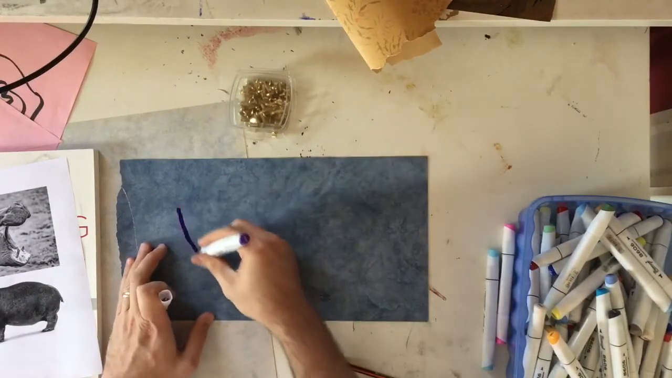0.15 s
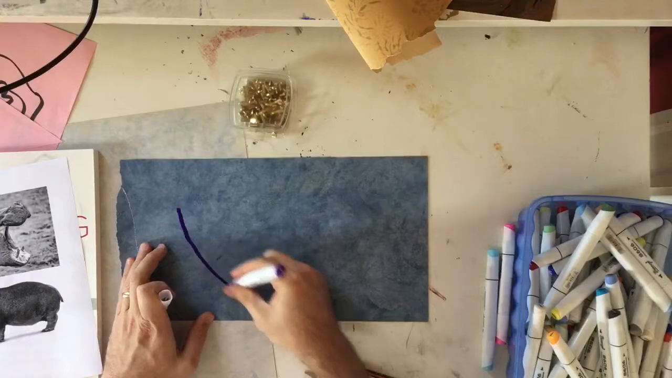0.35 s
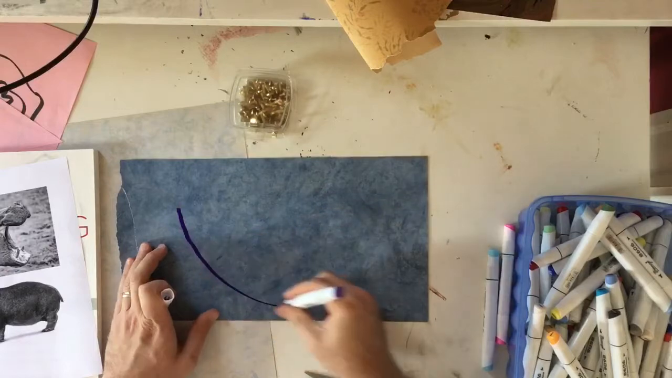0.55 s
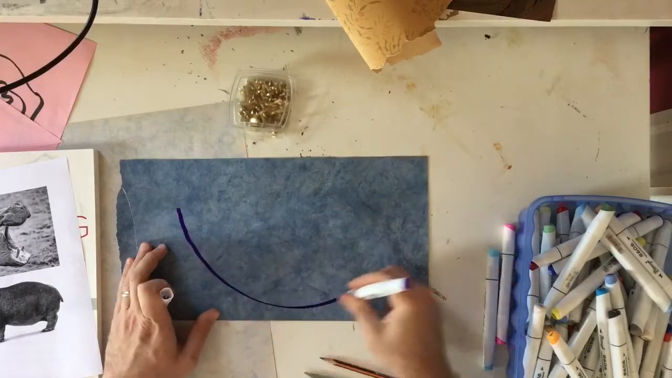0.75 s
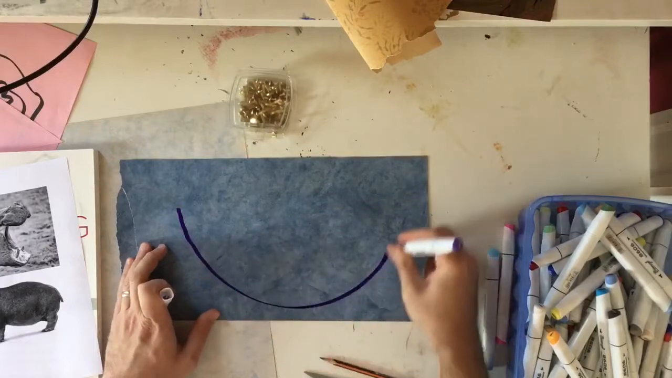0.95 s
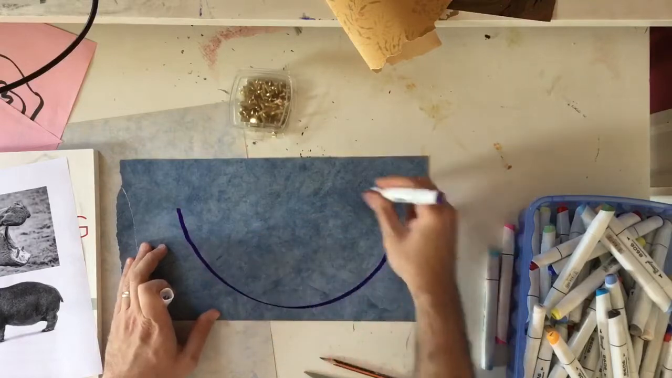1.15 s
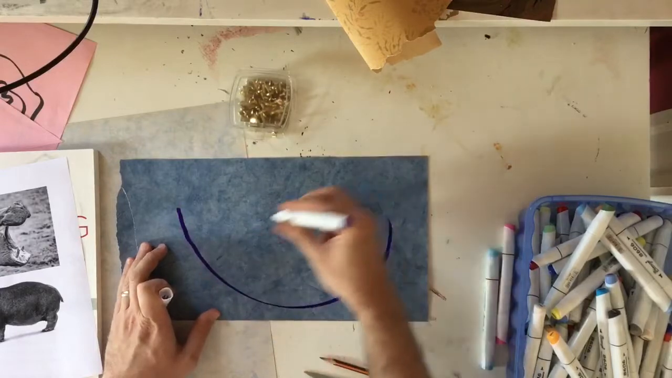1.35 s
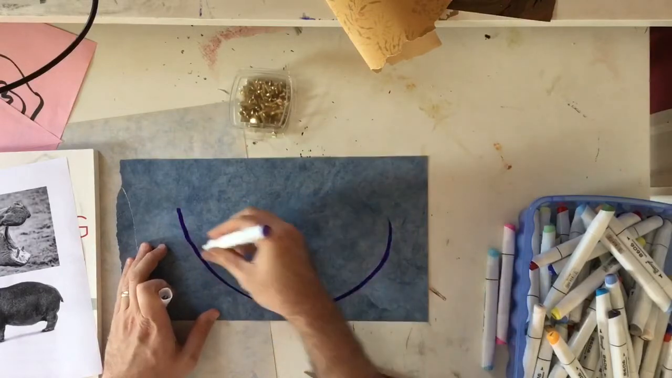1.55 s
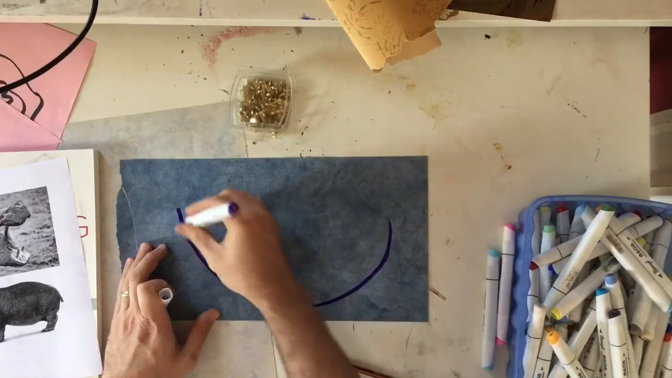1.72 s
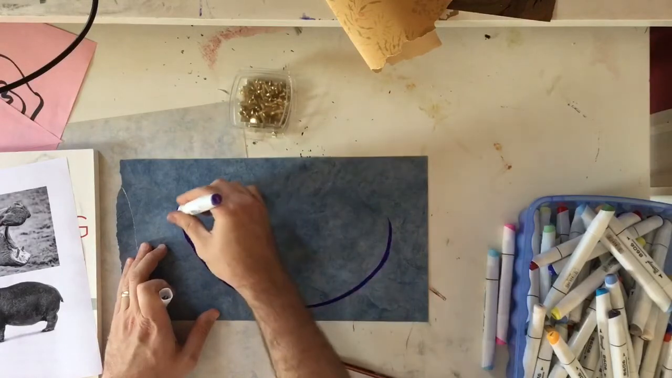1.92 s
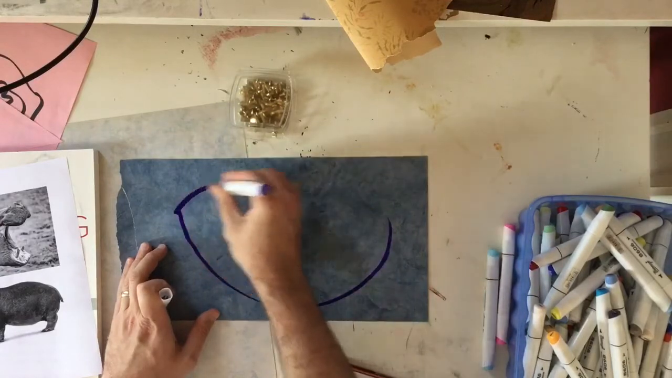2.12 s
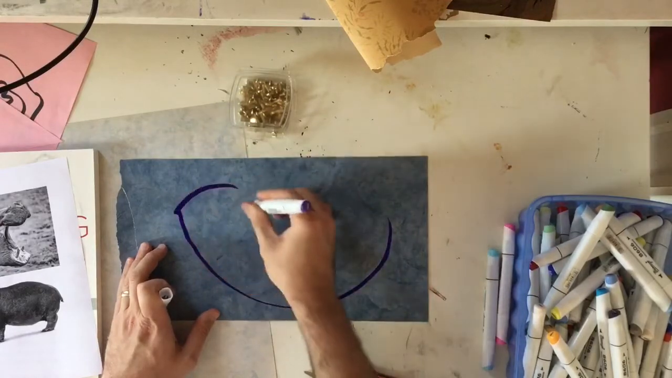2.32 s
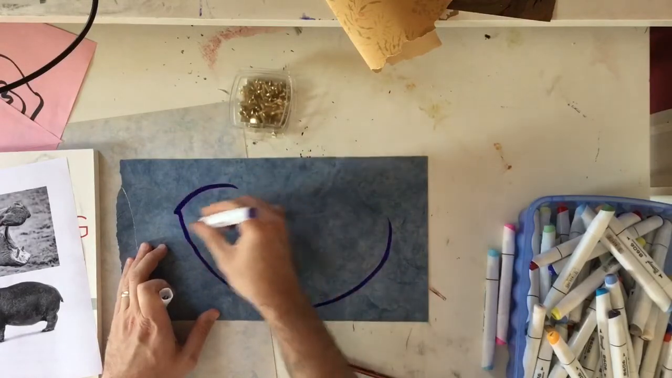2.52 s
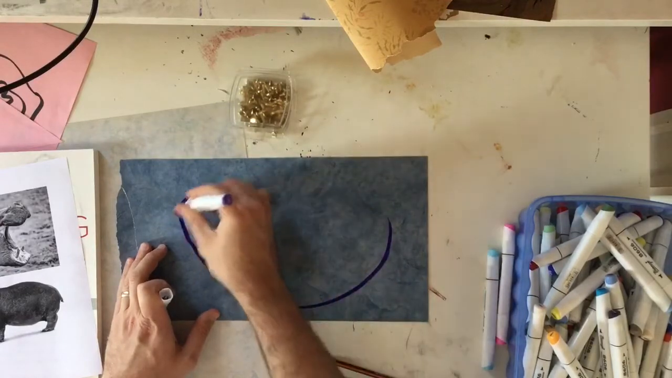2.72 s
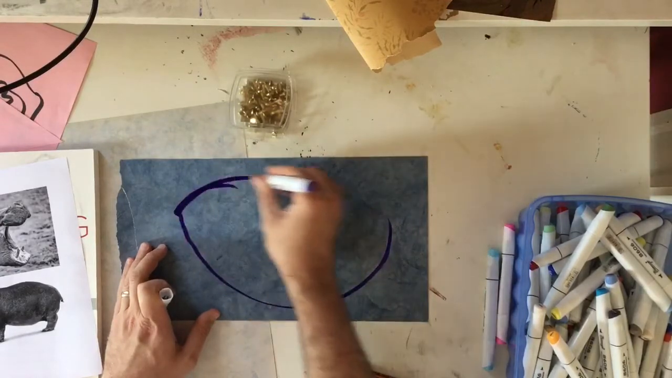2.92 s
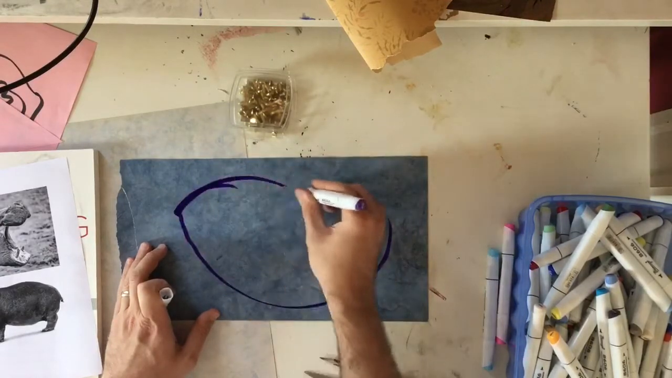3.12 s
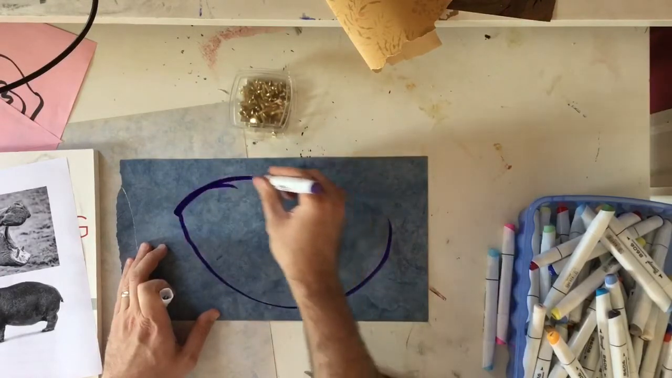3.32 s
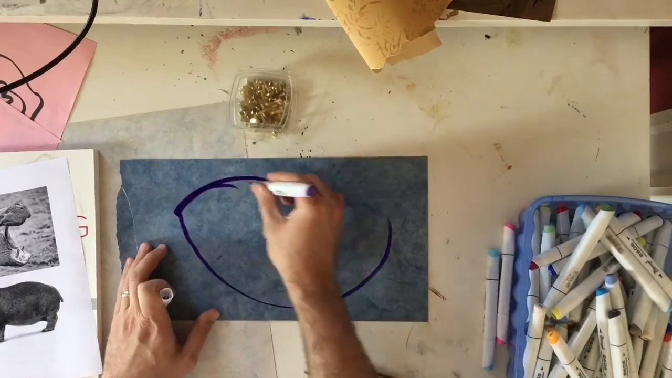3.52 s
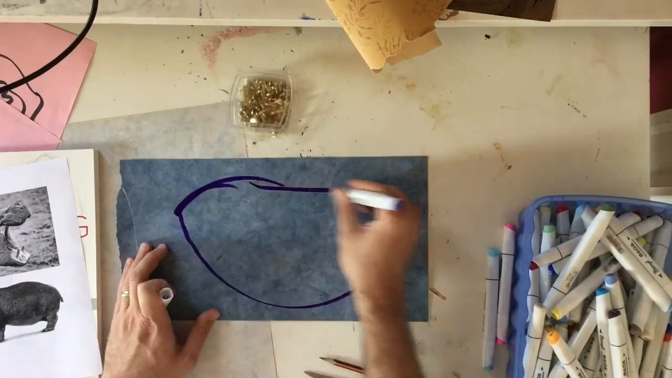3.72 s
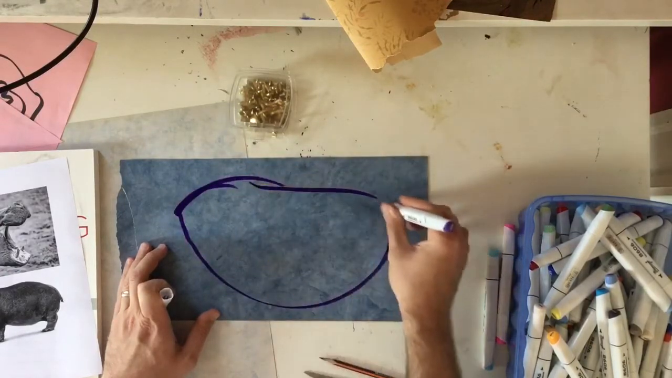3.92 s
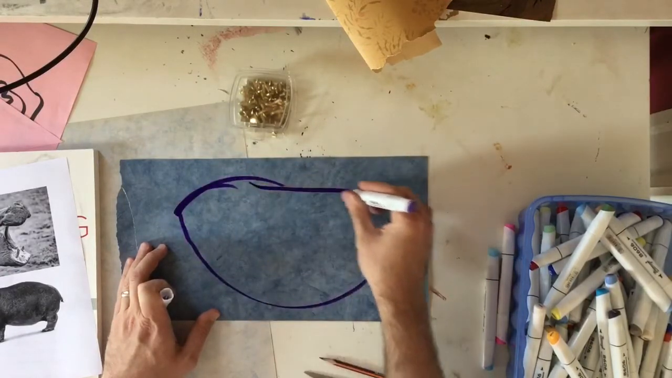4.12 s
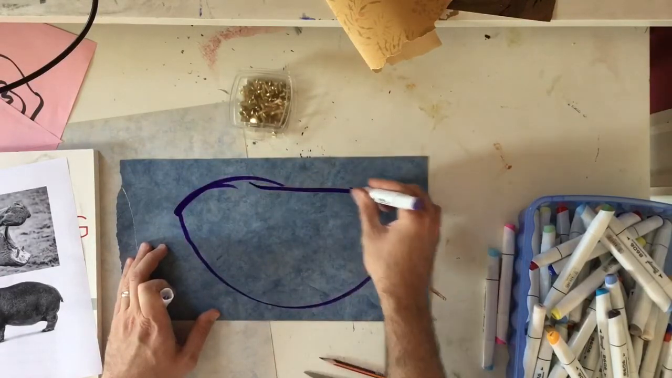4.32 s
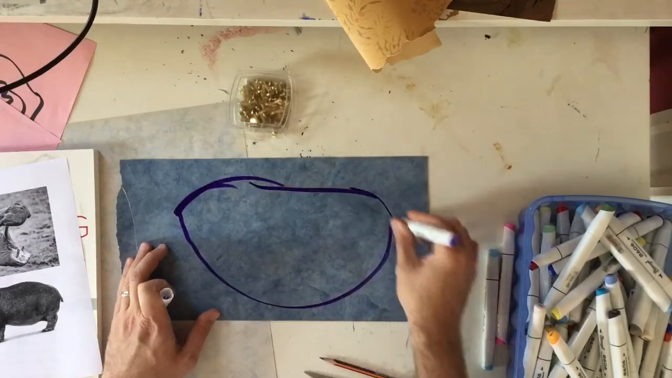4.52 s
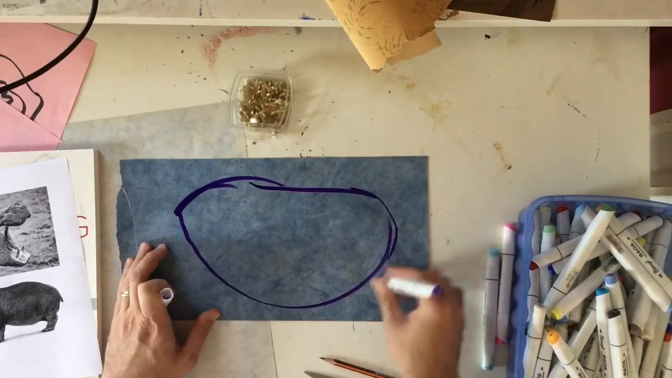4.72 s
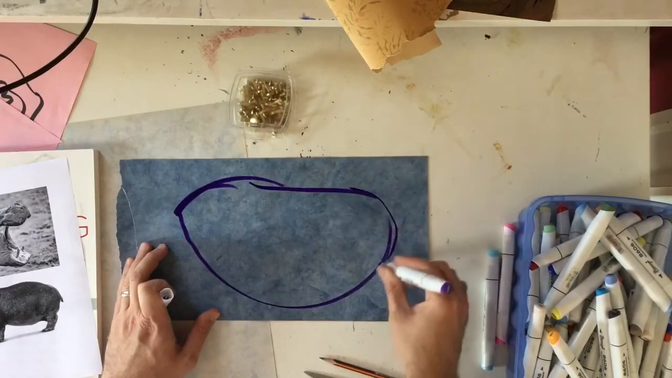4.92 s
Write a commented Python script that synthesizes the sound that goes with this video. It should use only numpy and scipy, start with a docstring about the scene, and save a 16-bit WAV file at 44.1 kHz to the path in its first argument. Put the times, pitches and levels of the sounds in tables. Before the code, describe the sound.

Close, hissy strokes of a felt-tip marker on heavy paper, one long and four shorter, with light table knocks in a small room.

```python
"""A felt-tip marker scratches over heavy paper, close to one microphone, on a table in a small room.
Five curved strokes, the first already under way: the nib lands with a soft thump, gathers speed and
lifts, its friction turning thinner and brighter towards the right of the sheet. Now and then the hand
knocks the table into ringing and the barrel ticks; between strokes the hand skims the paper.
Behind it all the room rumbles faintly."""
import sys
import numpy as np
from scipy import signal
from scipy.fft import rfft, irfft, next_fast_len
from scipy.io import wavfile
from scipy.ndimage import map_coordinates

SR = 44100
rng = np.random.default_rng(int(sys.argv[2]) if len(sys.argv) > 2 else 0)


def master_out(mix):
    """Clip the mix to full scale and print it as 16-bit PCM to the path in sys.argv[1]."""
    frames = np.transpose(np.atleast_2d(mix))
    ceiling = np.clip(frames, -1, 1)
    pcm = np.round(ceiling * 32767).astype(np.int16)
    wavfile.write(sys.argv[1], SR, pcm)


N = 222998


# The marker's path, close to the microphone. Each row: start, lift and attack in seconds, attack
# exponent, release in seconds, base levels of hiss, rub, judder and landing in dB, first and last
# place on the sheet (0 left, 1 right), the sheet's upper resonance at the start in Hz.
STROKES = [(-0.05, 0.98, 0.059, 0.61, 0.078, -59.5, -55.5, -64, -45, 0.015, 0.64, 1320),
           (1.891, 2.064, 0.15, 0.75, 0.26, -58, -55, -63.5, -43, 0.02, 0.47, 1730),
           (2.648, 2.922, 0.12, 0.42, 0.16, -59.5, -58, -58, -46, 0.11, 0.85, 1350),
           (3.458, 3.755, 0.19, 0.39, 0.084, -60, -58.5, -61, -45.5, 0.47, 1, 1350),
           (4.283, 4.617, 0.14, 0.38, 0.05, -62.5, -59, -68, -50.5, 1, 0.87, 1680)]
# The hand eases off. Each row: centre and half width in seconds, change of effort in dB.
EASINGS = [(0.11, 0.098, -4), (0.69, 0.23, -2), (2.91, 0.051, -1.5), (4.47, 0.09, -2)]
def strokes(release_db=22, rub_growth=1.14, rub_across_db=-9, glide_hz_per_s=570):
    """The nib's controls at every sample: each stroke speeds up, holds and dies away along its path."""
    rows, t = np.array(STROKES), np.arange(N) / SR
    current = rows[np.maximum(np.searchsorted(rows[:, 0], t) - 1, 0)]
    start, lift, attack, curve, release, hiss_db, rub_db, judder_db, _, first, last, peak_hz = current.T
    age = t - start
    speed = np.clip(age / attack, 1e-6, 1) ** curve
    effort_db = 20 * np.log10(speed) - release_db * np.maximum(t - lift, 0) / release
    effort_db += sum(db * swell(s, width) for s, width, db in EASINGS)
    place = first + (last - first) * np.clip(age / (lift - start), 0, 1)
    return dict(place=place, hiss_db=hiss_db + effort_db, judder_db=judder_db + effort_db,
                rub_db=rub_db + rub_growth * effort_db + rub_across_db * place,
                peak_hz=peak_hz + glide_hz_per_s * age)


# The paper from close by: the sheet's rub, the fibres' hiss and the fizz in the top octave.
# Each row: frequency in Hz, relative spectral density in dB.
RUB_SPECTRUM = [(100, -2), (480, -4), (750, -0.5), (1150, 1), (1500, 1), (1800, -2), (2050, -7.5),
                (2350, -6), (2900, -26), (5000, -28.5)]
HISS_SPECTRUM = [(25, -50), (300, -22), (1200, -15.5), (2500, -1), (3600, -0.9), (4600, -1.6), (5500, -0.3),
                 (6400, 1), (7400, -9), (9000, -20.5), (14000, -37)]
FIZZ_SPECTRUM = [(5000, -69), (7300, -0.5), (8200, 1), (9300, 5.5), (10200, 2), (11300, 4.5), (12800, -3.5),
                 (15700, -10)]
# Thin whistles as the felt turns. Each row: centre and half width in seconds, pitch in Hz, level in dB.
WHISTLES = [(4.355, 0.055, 12000, -73), (4.595, 0.035, 12800, -71)]
def nib(stroke, high_peak_db=-7.5, low_peak_hz=790):
    """Felt drags over the fibres: they hiss, and the sheet on the table resonates lower down."""
    drag = travelling(friction(snags_per_s=900, snag_db=-9), depth_db=3.3, bins=5, frames=20)
    pressure = amp(0.7 * wobble(45) + 0.6 * wobble(12))
    # towards the right the low resonance fades and the fizz grows
    low_peak_db = 1 - 23 * stroke["place"]
    fizz_db = -12 + 8 * stroke["place"]
    high_peak = amp(high_peak_db) * resonance(stroke["peak_hz"], width_hz=170)
    low_peak = amp(low_peak_db) * resonance(low_peak_hz, width_hz=430)
    rub = amp(stroke["rub_db"]) * (coloured(drag, RUB_SPECTRUM) + high_peak + low_peak)
    hiss = amp(stroke["hiss_db"]) * coloured(drag, HISS_SPECTRUM)
    fizz = amp(stroke["hiss_db"] + fizz_db) * coloured(drag, FIZZ_SPECTRUM)
    whistle = sum(amp(db) * swell(s, width) * resonance(hz, width_hz=600)
                  for s, width, hz, db in WHISTLES)
    return pressure * (rub + hiss + fizz + whistle)


def friction(snags_per_s, snag_db):
    """Countless tiny fibre slips, with a few stronger snags among them."""
    snags = (rng.random(N) < snags_per_s / SR) * rng.standard_normal(N)
    return unit(rng.standard_normal(N) + amp(snag_db) * unit(snags))


def travelling(x, depth_db, bins, frames):
    """As the contact travels over the sheet, narrow resonances come and go."""
    spectra = signal.stft(x, nperseg=1024)[2]
    patch = np.outer(np.hanning(bins), np.hanning(frames))
    ripple = signal.fftconvolve(rng.standard_normal(spectra.shape), patch, "same")
    return signal.istft(spectra * amp(depth_db * unit(ripple)), nperseg=1024)[1][:N]


def resonance(hz, width_hz):
    """A narrow band of noise around a steady or moving centre, at rms 1."""
    carrier = np.exp(2j * np.pi * np.cumsum(np.broadcast_to(hz, N)) / SR)
    baseband = lowpass(rng.standard_normal(N) * carrier.conj(), width_hz / 2, order=2)
    return unit(np.real(baseband * carrier))


# The tabletop right under the nib. Each row: frequency in Hz, relative spectral density in dB.
JUDDER_SPECTRUM = [(25, -60), (50, -25), (110, 4), (200, -6), (300, -3), (390, -4), (480, -17), (800, -40)]
def judder(stroke):
    """Friction shakes the tabletop, which answers with a low dull rub."""
    drag = travelling(friction(snags_per_s=140, snag_db=-3), depth_db=3.5, bins=4, frames=12)
    return amp(stroke["judder_db"]) * coloured(drag, JUDDER_SPECTRUM)


# The hand on the table, near the microphone. Each row: time in seconds, level in dB, contact hardness
# as a cutoff in Hz, boost of the low modes in dB, relative thud level in dB, damping in dB per second.
KNOCKS = [(0.426, -50, 219, -2, 0, 30), (0.485, -49, 278, -1, -4, 37), (0.7762, -37.5, 3450, -10, -1.5, 77),
          (0.78, -28, 770, 5, -16, 37), (2.884, -40, 407, -2.5, 5.5, 73)]
# The nib's soft, quickly damped landing, given as settings of blow().
LANDING = dict(hard_hz=450, boom_db=6, push_db=-0.5, thud_db=0, damping=62, sway_hz=69, sway_t60=0.2, boom_hz=165)
def table():
    """The table takes the hand's knocks and the nib's landings."""
    out = np.zeros(N)
    for s, db, hard_hz, boom_db, thud_db, damping in KNOCKS:
        add(out, s, amp(db) * blow(hard_hz, boom_db, thud_db, damping))
    for start, *_, landing_db, _first, _last, _peak_hz in STROKES:
        if start > 0:
            add(out, start, amp(landing_db) * blow(**LANDING))
    # the top radiates hardly any deep bass
    return signal.sosfilt(signal.butter(5, 47, "high", fs=SR, output="sos"), out)


# The table's modes. Each row: frequency in Hz, relative level in dB, free t60 in seconds.
TABLE_MODES = [(99, -14, 0.25), (119.6, 0, 0.31), (168.8, -7, 0.35), (216.8, -13, 0.5), (253.6, -13, 0.2),
               (282.6, -14, 0.21), (306, -9, 0.31), (346, -18, 0.22), (378, -19, 0.21), (406, -19.5, 0.2),
               (487, -14, 0.17), (531, -7, 0.16), (628, -5, 0.17), (696, -17, 0.26), (757, -14, 0.2),
               (863, -14, 0.2), (1000, -10, 0.22), (1276, -8, 0.18), (1372, -6.5, .16), (1423, -6, 0.16),
               (1504, -5.5, .17), (1648, -9.5, 0.14), (2155, -11.5, 0.18), (2246, -8.5, 0.16)]
# The dull body of a blow. Each row: frequency in Hz, relative spectral density in dB.
THUD_SPECTRUM = [(40, -35), (100, -29), (200, -20), (400, 8), (480, -20), (650, 8), (1600, -3.5),
                 (3500, -12), (8000, -21)]
def blow(hard_hz, boom_db, thud_db, damping, push_db=-10.5, sway_hz=69, sway_t60=0.2, boom_hz=230):
    """The table rings and its top sways; soft contacts reach only low modes, a resting hand damps them."""
    t = np.arange(SR * 3 // 4) / SR
    ring, thud_t60 = np.zeros(len(t)), 0.14
    for k, (hz, db, t60) in enumerate(TABLE_MODES):
        # a heavy blow favours the low modes
        mode_db = db + boom_db / (1 + (hz / boom_hz) ** 4) + rng.normal(0, 1)
        ring += (-1) ** k * amp(mode_db - 60 * t / t60) * np.sin(2 * np.pi * hz * t)
    sway = amp(push_db - 60 * t / sway_t60) * np.sin(2 * np.pi * sway_hz * t)
    thud = amp(thud_db - 60 * t / thud_t60) * coloured(rng.standard_normal(N), THUD_SPECTRUM)[:len(t)]
    return lowpass((ring + thud) * amp(-damping * t) + sway, hard_hz, order=8)


# The marker's barrel, close up. Each row: time in seconds, starting level in dB.
BARREL_TICKS = [(0.7765, -38.5), (0.7885, -52), (1.2561, -64.5)]
def barrel(t60=0.036, bright_hz=4600):
    """Hard plastic touches something: a short dry crack."""
    out, t = np.zeros(N), np.arange(SR // 8) / SR
    for s, db in BARREL_TICKS:
        crack = unit(lowpass(rng.standard_normal(len(t)), bright_hz, order=3))
        add(out, s, amp(db - 60 * t / t60) * crack)
    return out


# The side of the hand on the sheet, faint even this near.
# Each row: start and length in seconds, level in dB, fade in dB per second.
SKIMS = [(1.608, 0.27, -67, 80), (2.355, 0.1, -61.5, 5), (2.458, 0.21, -64, 57)]
# Skin on paper. Each row: frequency in Hz, relative spectral density in dB.
SKIN_SPECTRUM = [(1000, -24), (2500, -15.5), (4700, -11), (5400, 0), (6200, 0.5), (6800, -7), (8200, -12),
                 (9200, -9.5), (11500, -13), (13000, -16), (15700, -27)]
def hand(edge_s=0.029):
    """Dry skin whispers over the paper with a narrow peak in the treble; each skim fades as it goes."""
    t, level = np.arange(N) / SR, np.zeros(N)
    for start, length, db, fade in SKIMS:
        touch = np.clip(np.minimum(t - start, start + length - t) / edge_s, 0, 1)
        level += touch * amp(db - fade * np.clip(t - start, 0, length))
    return level * coloured(friction(snags_per_s=190, snag_db=-9.5), SKIN_SPECTRUM)


# The small room around the table. Each row: frequency in Hz, t60 in seconds.
ROOM_DECAY = [(100, 0.31), (600, 0.38), (2500, 0.17), (12000, 0.032)]
def room_echo(x):
    """The room answers after a short delay, each frequency dying at its own speed."""
    hz, t, spectra = signal.stft(rng.standard_normal(SR // 2), SR, nperseg=256)
    decay = amp(-60 * t / along(ROOM_DECAY, hz)[:, None])
    tail = signal.istft(spectra * decay, SR, nperseg=256)[1]
    tail = np.pad(tail, (SR // 200, 0))  # 5 ms
    return signal.fftconvolve(x, tail / np.linalg.norm(tail))[:N]


# Room tone at the microphone. Each row: frequency in Hz, relative spectral density in dB.
AIR_SPECTRUM = [(15, -55), (28, -30), (45, -8), (75, 0), (150, -6), (200, -7.5), (280, -10), (480, -19),
                (800, -22), (1960, -29.5), (3840, -34), (8000, -39.8), (11200, -40.1), (15600, -52.5)]
def room_tone(air_db=-62, rumble_hz=300, rumble_db=-2.2, swell_db=1.7, flutter_db=1.4):
    """Steady room noise whose low rumble swells and flutters a little."""
    air = amp(air_db) * coloured(rng.standard_normal(N), AIR_SPECTRUM)
    rumble = filtered(air, lambda hz: 1 / (1 + (hz / rumble_hz) ** 2))
    rumble_gain = amp(rumble_db + swell_db * wobble(4.98) + flutter_db * wobble(21.9))
    return air - rumble + rumble_gain * rumble


def amp(db):
    return 10 ** (np.asarray(db) / 20)


def unit(x):
    """x at rms 1."""
    return x / np.sqrt(np.mean(x ** 2) + 1e-20)


def along(points, hz):
    """Interpolate (Hz, value) points on a log frequency axis."""
    knots_hz, values = np.transpose(points)
    return np.interp(np.log(hz + 1), np.log(knots_hz + 1), values)


def wobble(rate):
    """A smooth random curve, rate knots a second."""
    return map_coordinates(rng.standard_normal(int(N * rate / SR) + 4), [np.arange(N) * rate / SR])


def swell(s, width):
    """A smooth rise to 1 at time s and back."""
    return np.exp(-((np.arange(N) / SR - s) / width) ** 2)


def filtered(x, response):
    """x through a gain that depends on frequency."""
    size = next_fast_len(N + SR // 2)
    return irfft(rfft(x, size) * response(np.fft.rfftfreq(size, 1 / SR)), size)[:N]


def coloured(x, spectrum):
    """x shaped by the given spectrum, at rms 1."""
    return unit(filtered(x, lambda hz: amp(along(spectrum, hz))))


def lowpass(x, hz, order):
    return signal.sosfilt(signal.butter(order, hz, fs=SR, output="sos"), x)


def add(track, s, sound):
    """Mix a sound into the track at time s."""
    part = track[round(s * SR):][:len(sound)]
    part += sound[:len(part)]


def scene():
    """Drawing and knocks close up in mono, each with a little echo, over the room tone."""
    stroke = strokes()
    drawing = nib(stroke) + judder(stroke) + hand()
    knocks = table() + barrel()
    echo = amp(-11) * room_echo(drawing) + amp(-9) * room_echo(knocks)
    return (drawing + knocks + echo + room_tone())[None]


def record(dry, top_hz=15750):
    """The recorder keeps nothing above its band limit."""
    return np.array([filtered(x, lambda hz: hz < top_hz) for x in dry])


dry = scene()
out = record(dry)
master_out(out)
```